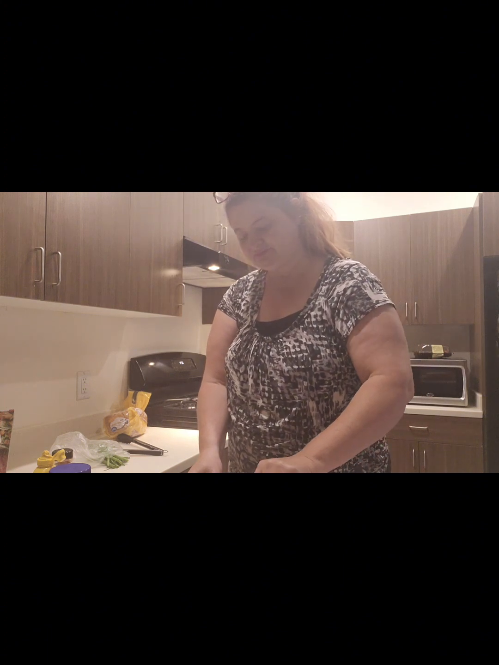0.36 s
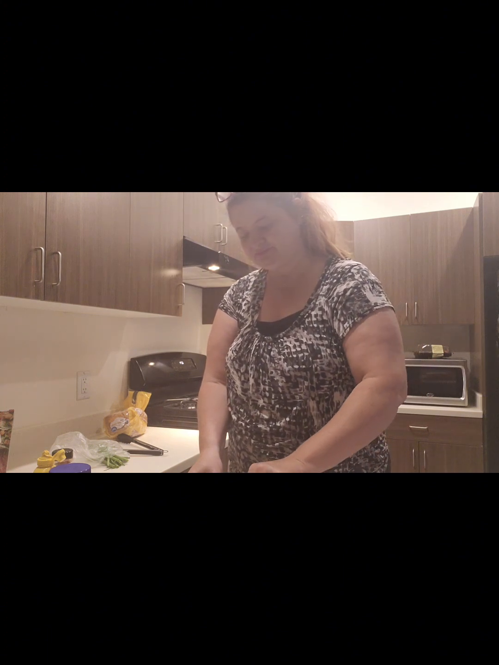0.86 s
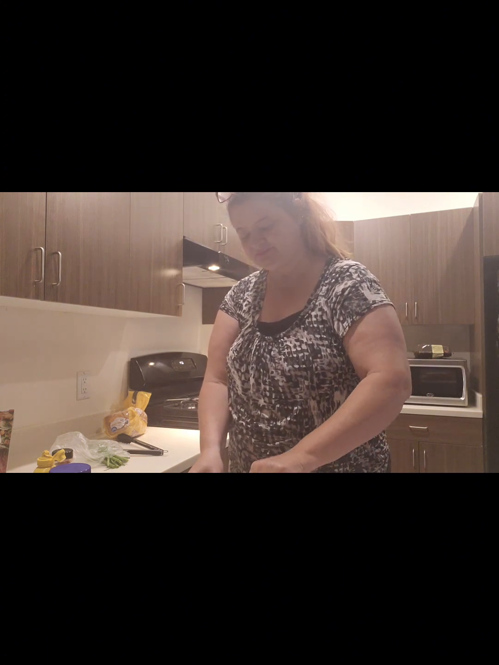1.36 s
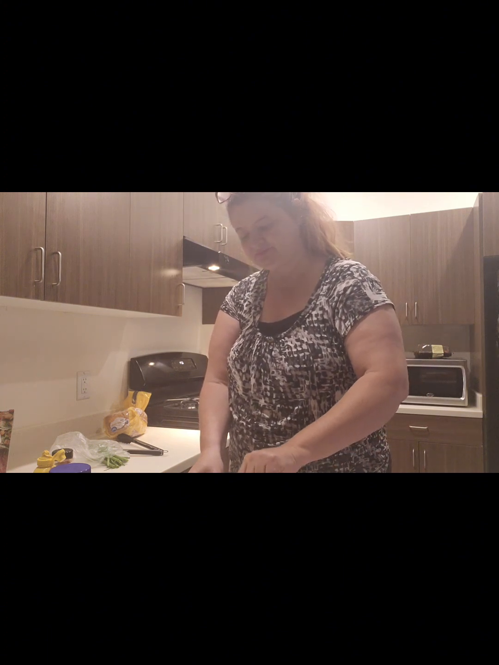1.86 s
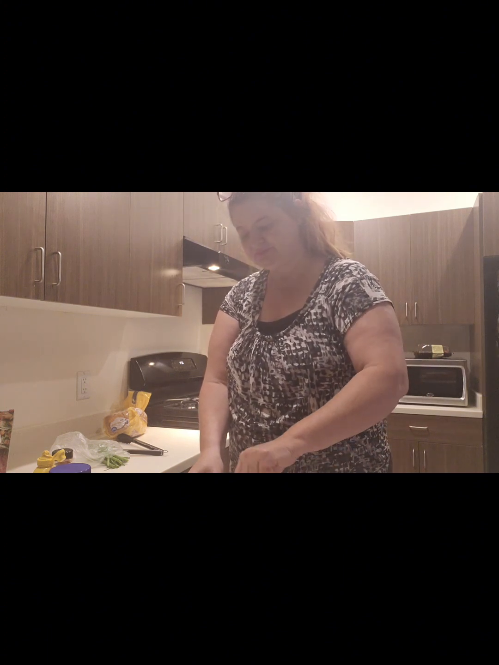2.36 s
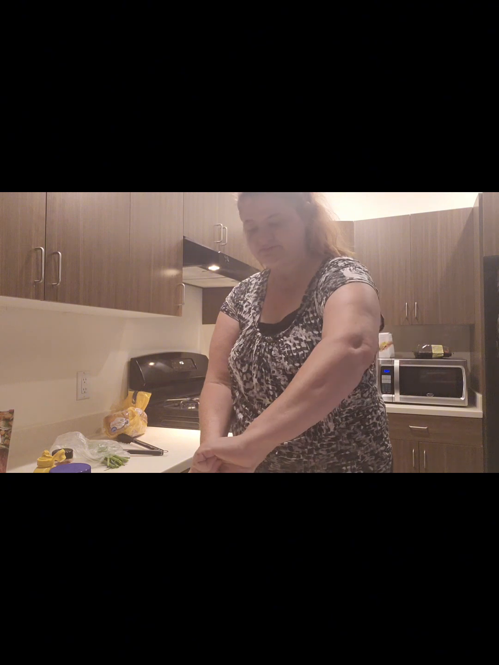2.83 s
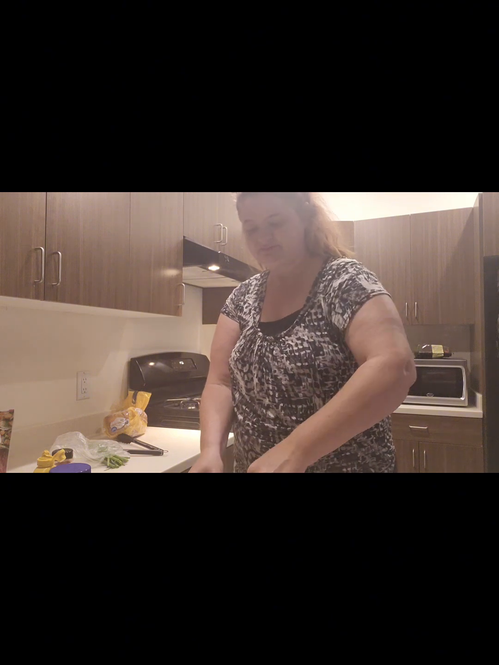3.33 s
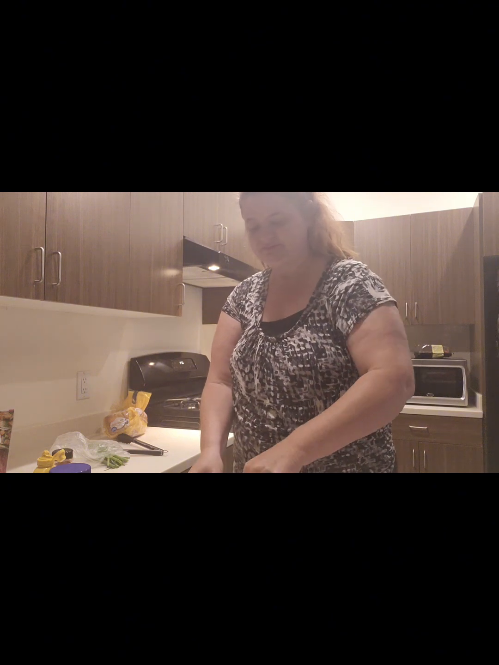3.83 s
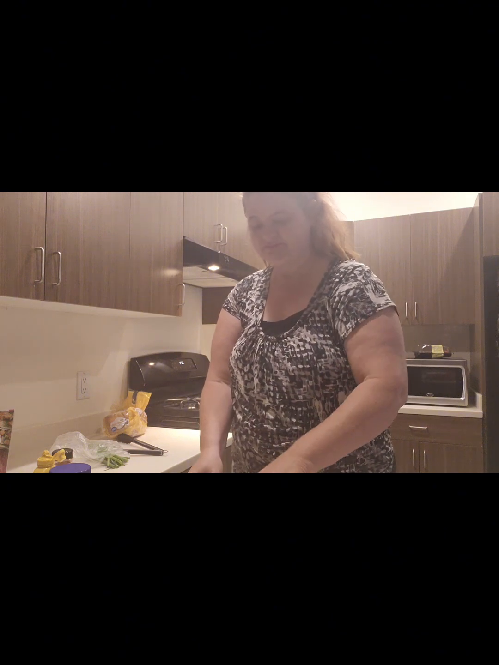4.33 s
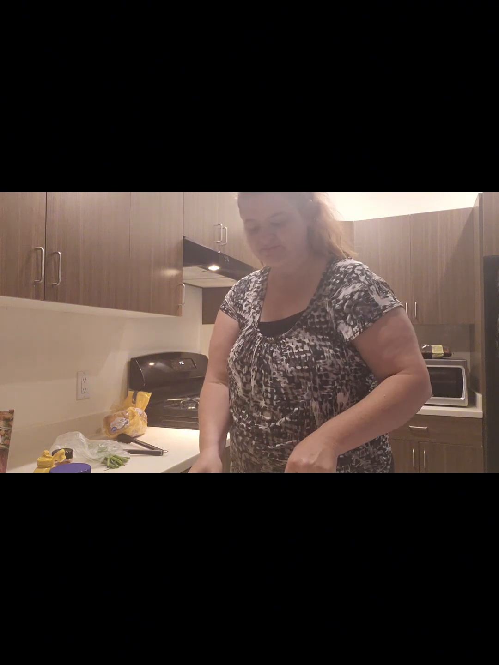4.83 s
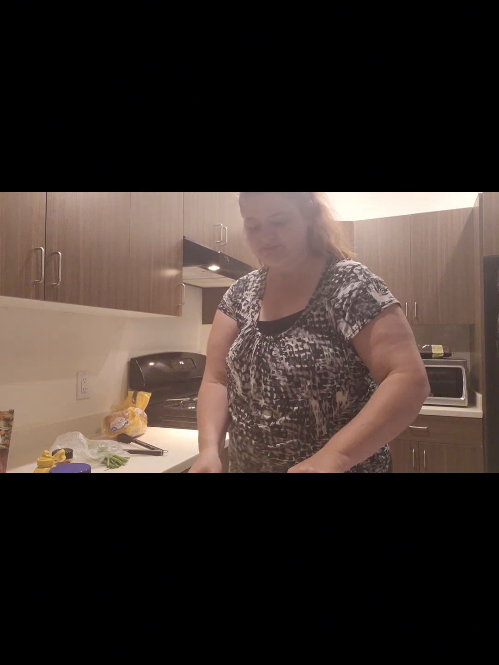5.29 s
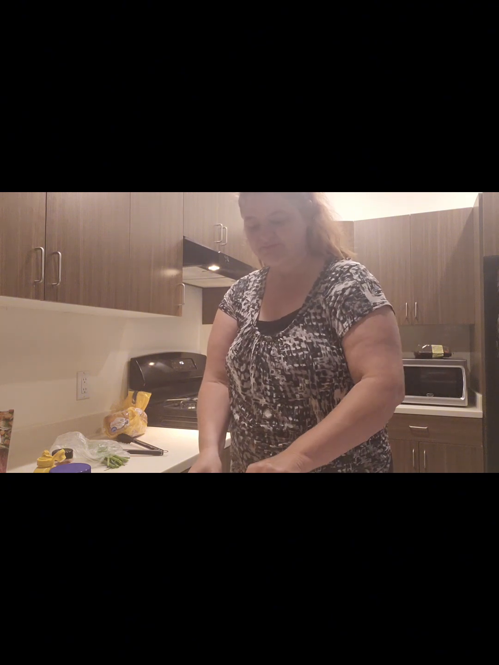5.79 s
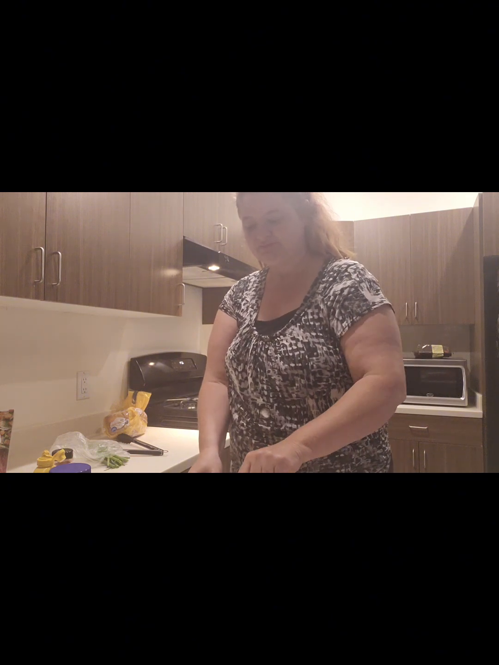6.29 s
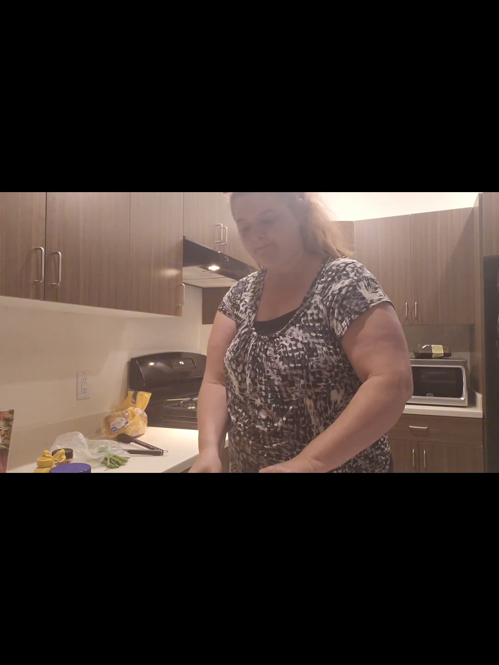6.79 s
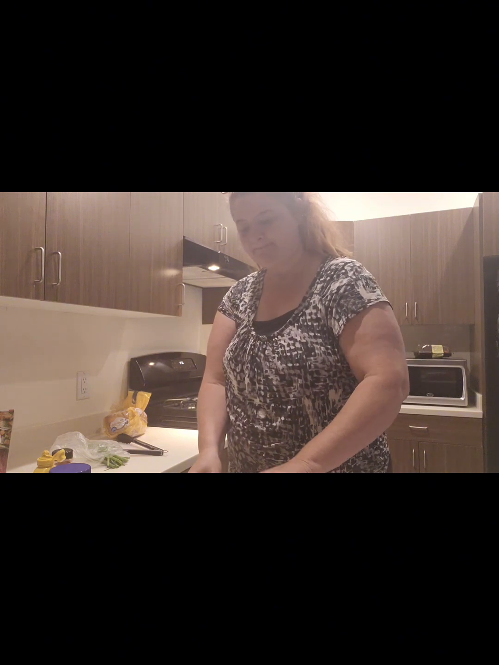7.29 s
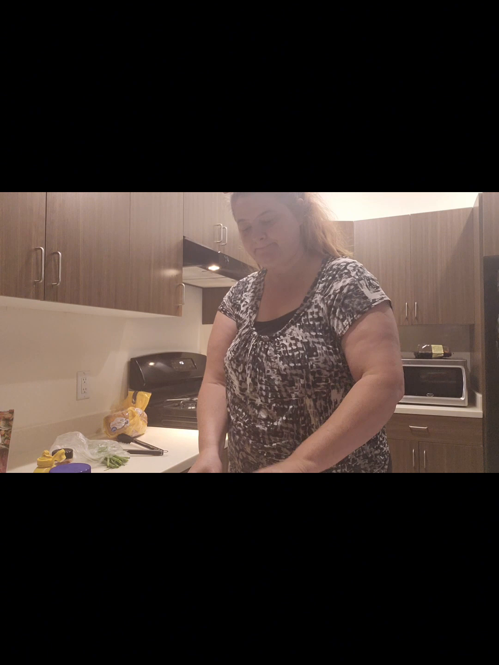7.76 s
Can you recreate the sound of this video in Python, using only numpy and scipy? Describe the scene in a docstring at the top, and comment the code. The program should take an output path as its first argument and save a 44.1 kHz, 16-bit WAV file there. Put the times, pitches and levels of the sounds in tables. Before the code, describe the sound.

A low ventilation hum runs under everything. Quick, uneven chops crack and thump in a bowl on a counter, slowing slightly, then a rim clank and a deep thud give way to scratchy metal scraping with two soft chops. Two more rim strikes ring out, the second hardest, then a short scrape and vigorous regular chopping. Close stereo pickup, hard kitchen echo after each blow.

```python
"""A metal utensil works food in a heavy bowl on a kitchen counter, close to a small stereo camera.
A fan hums throughout; at first an earlier blow dies away and chops crack and thump through the food.
A rim knock lets bowl and utensil ring and the bowl booms on the counter, then the edge scrapes along it.
Two more rim knocks follow, then more scraping, and chops again to the end.
Blows are noise cracks with decaying modes, scrapes are resonated slips; the hard room rings on."""
import sys
import numpy as np
from scipy import signal
from scipy.fft import rfft, irfft
from scipy.io import wavfile
from scipy.ndimage import uniform_filter1d

SR = 44100
rng = np.random.default_rng(int(sys.argv[2]) if len(sys.argv) > 2 else 0)


def put_to_file(sound):
    """Save the sound as 16-bit audio at rate SR, in the file named by the first command-line argument."""
    columns = np.atleast_2d(sound).T  # one column per channel
    safe = np.clip(columns, -1, 1)
    whole_steps = np.round(safe * 32767)
    wavfile.write(sys.argv[1], SR, whole_steps.astype(np.int16))


def linear_from_db(decibels):
    """Turn decibels (scalar or array-like) into linear amplitude factors; 0 gives 1."""
    return 10 ** (np.asarray(decibels, float) / 20)


N = 358956  # samples

# Levels in event tables are relative: each source adds its own offset.
# steady air noise of the fan: pitch_hz, level_db
FAN_COLOUR = [(18, -47.5), (30, -33.5), (149, -1.5), (259, -9), (319, -8.5), (404, -5.5), (822, -16.5),
              (1320, -18.5), (1460, -22.5), (5450, -43.5), (16000, -49.5)]
# low bands where duct and room lift the fan: pitch_hz, width_hz, level_db
FAN_LIFTS = [(59.84, 9.6, 21.5), (129.6, 17, 7), (178.45, 13, 3.5), (255.17, 11, 17.5), (402.47, 13, 11.5),
             (493.64, 22, 6.5), (721, 120, -10.5)]
FAN_DB = -46  # rms level at the camera, ahead of its microphones
# decay of the kitchen by band: pitch_hz, t60_s, level_db
ROOM_DECAY = [(60, 0.4, -3.5), (244, 0.3362, 3), (996, 0.73436, 0), (3072, 0.69798, 1), (6500, 0.725, -2),
              (13656, 0.40132, 3.5)]
# early reflections from counter and cupboards, ahead of a bass cut: delay_s, left_db, right_db
EARLY_ECHOES = [(.0016, -1.5, 0), (.0027, -2.5, -11.5), (.0055, -22.5, -19), (.0092, -3, -4.5),
                (0.02, -11, -22)]
# likeness of left and right in diffuse sound: pitch_hz, likeness (0 to 1)
LEFT_RIGHT_LIKENESS = [(50, 0.9709), (200, 0.8846), (400, 0.652), (800, 0.18), (1500, 0.022), (16000, .02)]
# colour of the left microphone port, the right has the opposite: pitch_hz, left_db
LEFT_COLOUR = [(50, -1.7566), (300, 1), (2000, -0.2285), (5000, 1.2505), (9000, -0.5), (14000, 2.5)]
LEAD_S = 0.00004  # the bowl's direct sound reaches the left port first

# free vibration of bowl, utensil and counter panel: pitch_hz, level_db, t60_s # the second table holds the
# utensil's modes together with bowl modes near 2.6-2.7 kHz that ring along with it
BOWL_MODES = [(1590, -11.5, 0.11), (1590.8, 2.5, 0.13366), (1655.1, -14.5, 0.34), (2600, -3, .1),
              (2610, -6, 0.23), (3811.4, -1.5, 0.049), (3822.3, -3.5, 0.22), (3910.9, 3, 0.047),
              (5142, -11, 0.2), (5443.8, 8.5, 0.029), (5561.1, 7.5, 0.036), (6744.9, 12, 0.018),
              (6192, -13.5, 0.13), (7438, 0, 0.15), (7340, -21, 0.034), (8005.8, -5, 0.069),
              (8699, -4, 0.11), (9086, -2.5, 0.031), (10070, -4, 0.026), (10838, -0.5, 0.072),
              (12069, -1.5, 0.067), (13175, -3, 0.045), (12600, -13.5, 0.028)]
UTENSIL_MODES = [(614.16, -7.5, 0.055), (1412.4, -5, 0.065), (2062, -31.5, 0.068), (2569.4, 2, 0.15),
                 (2700, 9, 0.059), (3897.2, -1, 0.095), (4192.4, 4, 0.06), (5201.7, -1, .1),
                 (5968, -16.5, .1), (6990, -36.5, .08), (10303, -24.5, 0.067), (10532, -22, 0.096)]
COUNTER_MODES = [(62.18, -9, 0.15), (82, -24, 0.21), (113, -8, 0.23), (175, -28.5, 0.2),
                 (201.51, -13.5, 0.46), (236.67, 3, 0.07883), (385.35, -9, 0.097), (618.85, -3.5, 0.043)]
# colour of a contact crack: pitch_hz, level_db
CRACK_COLOUR = [(240, -27), (400, 0), (505, -2.5), (757, -7.5), (793, -5), (971, -4.5), (1430, -7),
                (2400, 2), (3430, -2), (4260, 2), (4830, -4.5), (6900, -0.5), (9420, -13), (15300, -16),
                (16500, -47.5)]
# broad colour of the rasp under a scrape: pitch_hz, level_db
RASP_COLOUR = [(530, -43.5), (900, -12.5), (1410, -18), (1750, -9), (2830, -3.5), (3470, -14), (4010, -4.5),
               (16000, -32.5)]

# food pushed about, one list of breakpoints per passage: time_s, level_db
CRACKLE_PASSAGES = [
    [(2.85, -76), (3.478, -68.5), (4.184, -69), (4.344, -76), (4.528, -80), (4.7, -86)],
    [(5.5, -71.5), (5.606, -83), (5.838, -73.5), (6.01, -69.5), (6.302, -83), (6.4, -80.5)],
]
CRACKLES_PER_S, CRACKLE_SPREAD_DB, CRACKLE_HIGHPASS_HZ = 2300, 9.5, 4868
# strokes of the edge along the bowl:
# peak_s (hardest pressure), level_db, nominal edge pitch_hz, fade_s, edge_db (against the rasp)
SCRAPE_STROKES = [(2.99, -52, 3562, 0.13775, -3), (3.062, -50, 3545, 0.0509, 7.5),
                  (3.165, -39.5, 3559, 0.14588, 2.5), (3.3, -52.5, 3250, 0.2354, -15),
                  (3.46, -52, 3450, 0.1808, -3.5), (3.702, -39, 3632, 0.1003, 5),
                  (3.93, -53.5, 3362, 0.3442, -13.5), (4.159, -41.5, 3707, .09, 3.5),
                  (4.256, -48, 3150, .2, -12), (4.442, -54.5, 3093, .07, -15.5),
                  (5.546, -38, 3872, .09, -5.5), (5.7, -53.5, 2600, 0.0946, 7.5),
                  (5.831, -56, 3200, 0.1209, -11), (6.042, -34, 2601, 0.0376, 4),
                  (6.07, -51.5, 2600, 0.15185, -9), (6.284, -63, 3427, 0.02672, 6.5)]
# a stroke builds up in this share of its fade time, from and to this far below its top
RISE_SHARE, FADE_DB = 0.41, -13.5
# under light pressure the edge sounds lower (pitch factor) and weaker (dB)
EASED_PITCH, EASED_EDGE_DB = 0.95997, -11.5
# small clicks of the utensil's edge: start_s, level_db, pitch_hz
EDGE_TICKS = [(0.7178, -48, 2620), (2.7781, -46, 2700), (3.2498, -40.5, 6500), (3.4516, -42.5, 7513),
              (4.2532, -40.5, 7000), (5.7194, -53.5, 7096), (5.7496, -43, 2600), (5.825, -50.5, 3550),
              (6.2821, -48, 5200)]
# the bowl is set down or rocks on the counter: start_s, level_db, boom pitch_hz, foot knock_db
BOWL_THUDS = [(1.101, -23.5, 123, -39.5), (1.35, -29, 103, -64), (2.6, -16.5, 113, -33),
              (2.931, -40.5, 61.9, -55), (3.885, -35, 113, -66.5), (4.348, -38, 112, -54.5),
              (6.057, -46, 157, -67), (7.6, -31, 113, -63.5)]
# knocks on the bare rim: start_s, crack_db, dull_db (dull part of crack), bright_db (bright part), # bowl_db
# (bowl ring), utensil_db (utensil ring with the bowl modes near 2.6-2.7 kHz)
RIM_KNOCKS = [(2.4775, -17.5, -10.5, -13, -35.5, -28.5), (4.7405, -15.5, 0, -2, -30.5, -27),
              (5.1084, -6.5, -14, -0.5, -18, -27.5)]
# hard knocks brighten the ring: dB per octave for each dB of crack above HARD_FROM_DB
RIM_THUMP_DB, HARD_FROM_DB, HARD_TILT = -35.5, -8, 0.27
# blows into the food: start_s, crack_db, weight_db (weight behind the blow), clang_db, clang pitch_hz
FOOD_CHOPS = [(0.0998, -13.5, -9.5, -3, 2600), (0.3008, -11, -14, -2.5, 2413),
              (0.4682, -11.5, -8.5, -2, 1593), (0.62, -18, -6.5, 6, 1590), (0.832, -15, -7, -5, 2732),
              (1.0296, -12.5, -5, -5, 2964), (1.276, -11, -7.5, -14, 2793), (1.6085, -13.5, -8, -16, 2552),
              (1.9283, -15.5, -8, -11.5, 2700), (2.2403, -7.5, -11, -5, 2660),
              (3.5297, -20, -5.5, -8.5, 1686), (4.0329, -25, -5, -1, 1590),
              (5.9359, -21.5, -9, -10.5, 1917), (6.4439, -6.5, -14, -3.5, 2375),
              (6.7156, -4.5, -16.5, -6.5, 2781), (6.9584, -6, -11.5, 1, 2600),
              (7.214, -7, -9.5, -4.5, 2739), (7.5177, -14.5, -2, -6, 2802),
              (7.7884, -9.5, -8.5, -7.5, 2843), (8.0695, -9.5, -10.5, -4, 2610)]
# a heavy blow thumps the counter and dulls the crack
THUMP_DB, THUMP_PER_WEIGHT = -15.5, 0.6003
# an edge that cuts through to the bowl clangs and cracks brighter
BRIGHT_DB, BRIGHT_PER_CLANG = -7.5, 0.16152
# reach of the clang around its pitch (6 dB down); modes further off still sound at CLANG_FAR_DB
CLANG_OCTAVES, CLANG_FAR_DB, CLANG_T60_S = 0.33, -13.5, 0.015


def unit_rms(x):
    """Scales to an rms of one."""
    return x / np.sqrt(np.mean(x ** 2) + 1e-20)


def read(points, hz, column=1):
    """Reads a column of a table between its pitches, on a logarithmic pitch axis."""
    table = np.transpose(points)
    return np.interp(np.log(hz + 1), np.log(table[0] + 1), table[column])


def colour(x, gain):
    """Filters by a gain that is a function of Hz."""
    size = x.shape[-1]
    return irfft(rfft(x) * gain(np.fft.rfftfreq(size, 1 / SR)), size)


def high_pass(x, hz):
    """Second-order cut of everything below a pitch."""
    return signal.lfilter(*signal.butter(2, hz / SR * 2, "high"), x)


def add(mix, start_s, sound):
    """Lays a sound into the mix, cut off at its end."""
    part = mix[round(start_s * SR):][:len(sound)]
    part += sound[:len(part)]


def pair(a, b):
    """Two unrelated signals become a left-right pair, alike in the bass."""
    def alike(hz):
        return np.clip(read(LEFT_RIGHT_LIKENESS, hz), 0, 1)

    shared = colour(a, alike)
    separate = colour(b, lambda hz: np.sqrt(1 - alike(hz) ** 2))
    return np.array([a, shared + separate])


def fan():
    """Air noise, lifted in a few low bands where duct and room resonate."""
    def lift(hz):
        return 1 + sum(linear_from_db(db) / (1 + (2 * (hz - f) / width) ** 2) for f, width, db in FAN_LIFTS)

    air = pair(*rng.standard_normal((2, N)))
    return linear_from_db(FAN_DB) * unit_rms(colour(air, lambda hz: linear_from_db(read(FAN_COLOUR, hz)) * lift(hz)))


def earlier_blow():
    """A blow just before the start still echoes: diffuse crack-coloured noise, fading 110 dB a second."""
    noise = colour(rng.standard_normal((2, N)), lambda hz: linear_from_db(read(CRACK_COLOUR, hz)))
    return unit_rms(pair(*noise)) * linear_from_db(-32.5 - 110 * np.arange(N) / SR)


def tail():
    """Diffuse decay, each band dying at its own speed, building up over the first milliseconds."""
    hz, t, bands = signal.stft(pair(*rng.standard_normal((2, SR))), SR, nperseg=256)
    level_db = read(ROOM_DECAY, hz, column=2)[:, None] - 60 * t / read(ROOM_DECAY, hz)[:, None]
    decay = signal.istft(bands * linear_from_db(level_db), SR, nperseg=256)[1][:, :SR]
    decay = decay * np.clip(np.arange(SR) / SR / 0.011406 - 0.3, 0, 1)
    return decay / np.linalg.norm(decay[0])


def room(x, wet_db):
    """Direct sound, echoes from counter and cupboards, and three diffuse tails crossfaded in turn."""
    taps = np.zeros((2, SR // 20))
    for delay_s, *db in EARLY_ECHOES:
        arrivals = round(delay_s * SR) + rng.integers(0, 30, 2)
        taps[[0, 1], arrivals] = linear_from_db(db) * rng.choice([-1, 1], 2)
    taps = high_pass(taps, 450)  # small surfaces return little bass
    taps[[0, 1], [0, round(LEAD_S * SR)]] = 1  # direct sound
    out = signal.oaconvolve(x[None], taps, axes=1)[:, :N]
    for k in range(3):
        # the squares of the three windows always add up to one
        window = np.sqrt(2 / 3) * np.cos(np.pi * (np.arange(N) / SR * 1.3 + k / 3))
        out += linear_from_db(wet_db) * signal.fftconvolve((x * window)[None], tail(), axes=1)[:, :N]
    return out


def crackle(rows):
    """Food crackles faintly: tiny dry snaps of uneven size, a few standing out."""
    s, db = np.transpose(rows)
    t = np.arange(s[0], s[-1], 1 / SR)
    size = linear_from_db(CRACKLE_SPREAD_DB * np.minimum(rng.exponential(1, len(t)), 5))
    happens = rng.random(len(t)) < CRACKLES_PER_S / SR
    snaps = rng.standard_normal(len(t)) * size * happens
    snaps = unit_rms(high_pass(snaps, CRACKLE_HIGHPASS_HZ))
    return s[0], linear_from_db(np.interp(t, s, db) + 3.5) * snaps * signal.windows.tukey(len(t), 0.1)


def scrape(rows):
    """Dense tiny slips of uneven size excite the sliding edge, a fainter lower tone and a broad rasp."""
    s, *columns = np.transpose(rows)
    t = np.arange(s[0], s[-1], 1 / SR)
    db, hz, edge_db = (np.interp(t, s, c) for c in columns)
    size = linear_from_db(2 * rng.exponential(1, len(t)))
    slips = rng.standard_normal(len(t)) * size * (rng.random(len(t)) < 0.2)
    sound = unit_rms(colour(slips, lambda f: linear_from_db(read(RASP_COLOUR, f))))
    r = np.exp(-np.pi * 450 / SR)  # damping of the moving resonance
    for pitch_factor, part_db in ((0.99086, -2.0), (0.441, -15.0)):
        turn = np.exp(2j * np.pi * np.cumsum(pitch_factor * hz) / SR)
        edge = turn * signal.lfilter([1], [1, -2 * r, r * r], slips / turn)  # a resonance applied twice
        sound += linear_from_db(edge_db + part_db) * unit_rms(edge.real)
    return s[0], linear_from_db(db - 8.0) * sound * signal.windows.tukey(len(t), 0.15)


def stroke(peak_s, db, hz, fade_s, edge_db):
    """Pressure builds, peaks and eases; level, pitch and sharpness of the edge follow it."""
    eased = (db + FADE_DB, EASED_PITCH * hz, edge_db + EASED_EDGE_DB)
    begin = (peak_s - RISE_SHARE * fade_s, *eased)
    return scrape([begin, (peak_s, db, hz, edge_db), (peak_s + fade_s, *eased)])


def ring(modes, tilt_db=0):
    """One blow sets decaying modes going; chance varies each mode's level and pitch a little."""
    hz, db, t60 = np.transpose(modes)[:, :, None]
    t = np.arange(SR * 3 // 4) / SR
    scatter = rng.standard_normal((len(modes), 2)) * (1.2, 0.001)  # level in dB, share of pitch
    level = linear_from_db(db + tilt_db * np.log2(hz / 3000) + scatter[:, :1] - 60 * t / t60)
    level[1::2] *= np.where(hz[1::2] > 1000, -1, 1)  # neighbouring high modes start in opposite sense
    return (level * np.sin(2 * np.pi * hz * (1 + scatter[:, 1:]) * t)).sum(0)


def push(hz):
    """A half-sine force, half a cycle of hz long; a short contact reaches higher."""
    size = max(int(SR / hz / 2), 2)
    return np.sin(np.pi * (np.arange(size) + 0.5) / size) * np.pi / 2 / size


def crack(dull_db, bright_db):
    """A burst of a few milliseconds: chance sets its fine shape, the contact sets its colour."""
    t = np.arange(2048) / SR
    hz = np.fft.rfftfreq(len(t), 1 / SR)
    tilt = [(1300, dull_db + 12), (2200, 0.0048), (4500, 0.018), (6500, bright_db + 9)]  # Hz, dB
    burst = rfft(rng.standard_normal(len(t)) * t * np.exp(-t / 0.0008579))
    burst = burst / np.sqrt(uniform_filter1d(abs(burst) ** 2, size=12))  # flat in the large
    sound = irfft(burst * linear_from_db(read(CRACK_COLOUR, hz) + read(tilt, hz)))
    sound = sound * (1 - np.exp(-t / 0.00031235)) * np.exp(-t / 0.024)
    return sound / np.linalg.norm(sound)


def tick(db, hz):
    """A short damped click."""
    t = np.arange(400) / SR
    return linear_from_db(db + 14.5) * np.sin(2 * np.pi * hz * t) * np.exp(-t / 0.00021)


def thud(db, hz, knock_db):
    """A soft heavy contact: a short boom of the counter panel, its low modes and a dull knock."""
    t = np.arange(SR // 4) / SR
    out = linear_from_db(db - 6.0) * np.convolve(ring(COUNTER_MODES), push(290))
    boom = np.sin(2 * np.pi * hz * t) * (1 - np.exp(-t / 0.00047)) * np.exp(-t / 0.008973)
    add(out, 0, linear_from_db(db + 4.0) * boom)
    add(out, 0, linear_from_db(knock_db + 27) * crack(45, -31.5))
    return out


def blow(crack_db, thump_db, dull_db, bright_db, rings):
    """Crack, thump through the counter and ring of one blow."""
    out = rings.copy()
    add(out, 0, linear_from_db(crack_db + 17.5) * crack(dull_db, bright_db))
    add(out, 0, linear_from_db(thump_db + 6) * np.convolve(ring(COUNTER_MODES), push(580)))
    return out


def rim(crack_db, dull_db, bright_db, bowl_db, utensil_db):
    """On the bare rim bowl and utensil ring freely; a hard knock drives the high modes."""
    hard_db = HARD_TILT * (crack_db - HARD_FROM_DB)
    bowl = high_pass(ring(BOWL_MODES, hard_db), 1100)  # the bowl ring carries nothing below about 1.1 kHz
    rings = linear_from_db(bowl_db) * bowl + linear_from_db(utensil_db) * ring(UTENSIL_MODES, hard_db)
    return blow(crack_db, RIM_THUMP_DB, dull_db, bright_db, rings)


def chop(crack_db, weight_db, clang_db, hz):
    """Food and hand deaden the bowl to a short clang; the mode nearest hz leads, all detuned to meet it."""
    modes = np.array(BOWL_MODES[2::2])  # close pairs merge when deadened
    nearest = modes[np.argmin(abs(modes[:, 0] - hz)), 0]
    tuned = modes[:, 0] * hz / nearest
    near_db = np.maximum(-6 * (np.log2(tuned / hz) / CLANG_OCTAVES) ** 2, CLANG_FAR_DB)
    t60 = np.minimum(modes[:, 2], CLANG_T60_S)
    deadened = np.transpose([tuned, near_db + 0.46 * modes[:, 1], t60])
    thump_db = crack_db + THUMP_DB + THUMP_PER_WEIGHT * weight_db
    bright_db = BRIGHT_DB + BRIGHT_PER_CLANG * clang_db
    clang = linear_from_db(crack_db + clang_db + 3) * ring(deadened)
    return blow(crack_db, thump_db, weight_db, bright_db, clang)


def scene():
    """Blows and rubbing at the bowl go through the room; the earlier blow and the fan join as they are."""
    bowl, rubbing = np.zeros((2, N))
    sources = ((FOOD_CHOPS, chop), (RIM_KNOCKS, rim), (BOWL_THUDS, thud), (EDGE_TICKS, tick))
    for table, source in sources:
        for start_s, *row in table:
            add(bowl, start_s, source(*row))
    for row in SCRAPE_STROKES:
        add(rubbing, *stroke(*row))
    for rows in CRACKLE_PASSAGES:
        add(rubbing, *crackle(rows))
    at_bowl = room(bowl, wet_db=2) + room(linear_from_db(2.5) * rubbing, wet_db=-2.5)
    return at_bowl + earlier_blow() + fan()


def low_pass(x):
    """Removes everything above the highest recorded frequency."""
    return signal.sosfilt(signal.butter(12, 16990, fs=SR, output="sos"), x)


def record(dry):
    """Ports of unequal colour, deaf to deep bass; gain control turns down after loud blows; peaks round off."""
    ports = np.array([colour(x, lambda hz: linear_from_db(sign * read(LEFT_COLOUR, hz)))
                      for x, sign in zip(dry, (1, -1))])
    ports = signal.sosfilt(signal.butter(3, 45 / SR * 2, "high", output="sos"), ports)
    power = uniform_filter1d((ports ** 2).mean(0), 4000)
    power_db = 10 * np.log10(abs(power) + 1e-12)
    fall_db = np.arange(N) * 2.9 / SR  # the held level falls 2.9 dB a second
    held_db = np.maximum.accumulate(power_db + fall_db) - fall_db
    over_db = np.maximum(held_db + 24.0, 0)
    late_db = signal.lfilter([1 / 3000], [1, 1 / 3000 - 1], over_db)  # reacts over 3000 samples
    levelled = ports / linear_from_db(0.18 * late_db)
    mix = 0.84063 * np.tanh(levelled / 0.86595)
    return low_pass(mix)


dry = scene()
out = record(dry)
put_to_file(out)
```